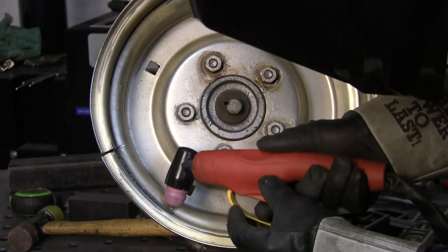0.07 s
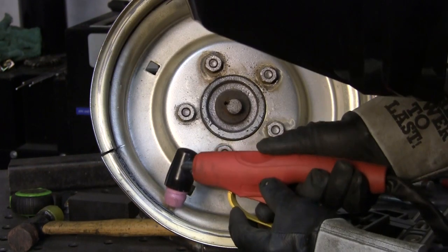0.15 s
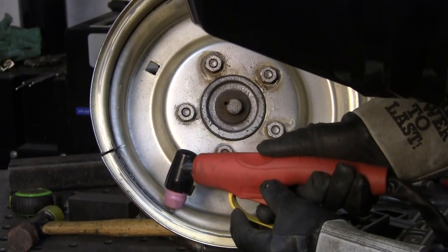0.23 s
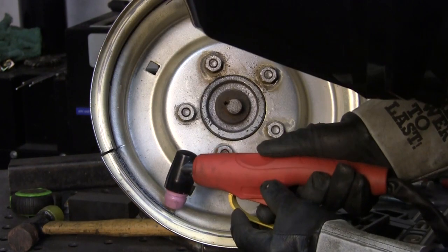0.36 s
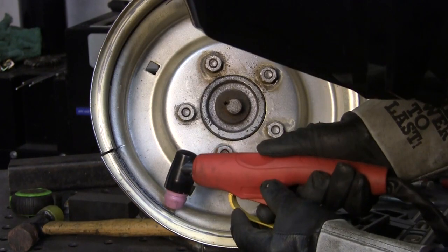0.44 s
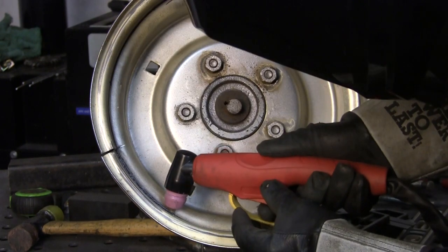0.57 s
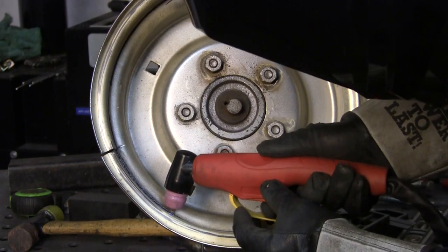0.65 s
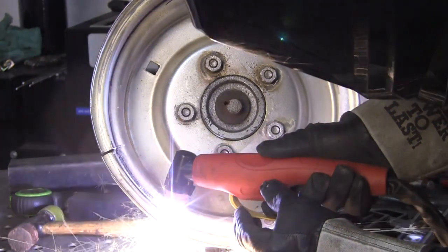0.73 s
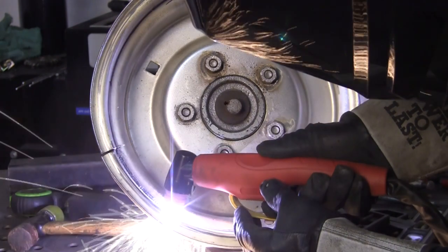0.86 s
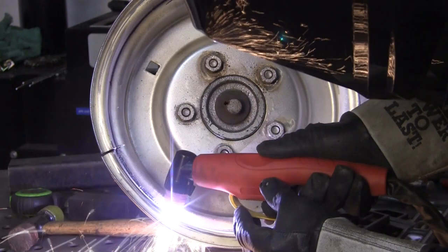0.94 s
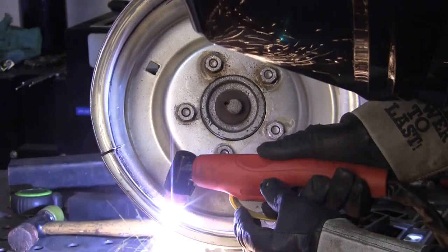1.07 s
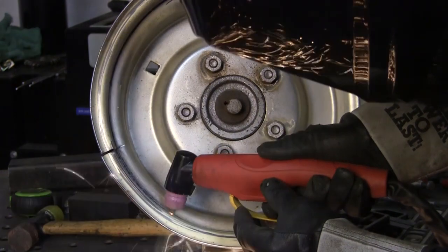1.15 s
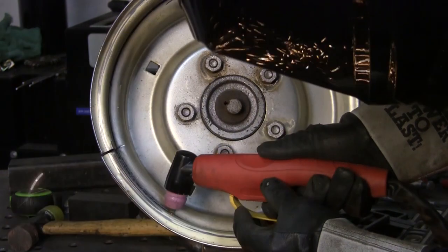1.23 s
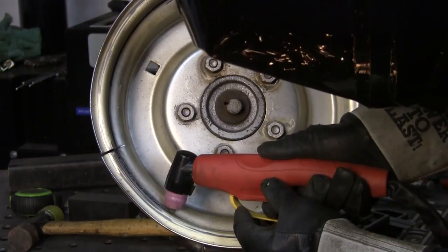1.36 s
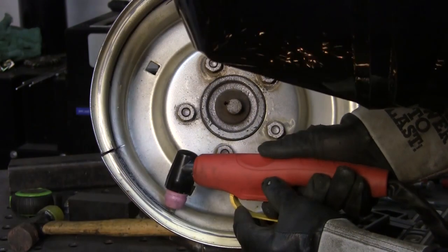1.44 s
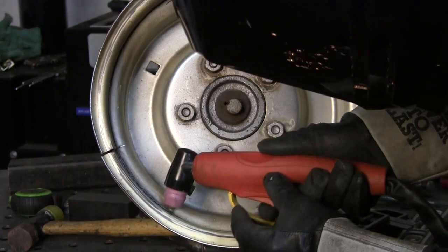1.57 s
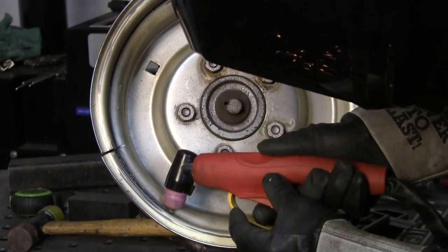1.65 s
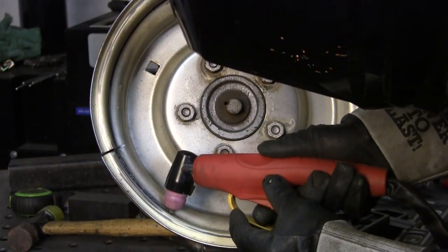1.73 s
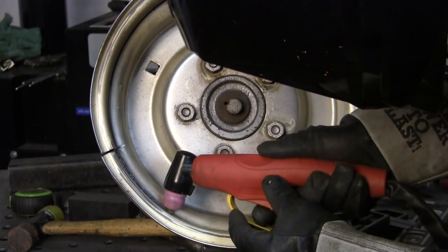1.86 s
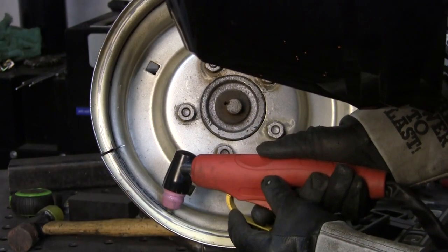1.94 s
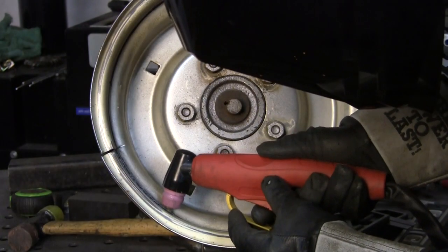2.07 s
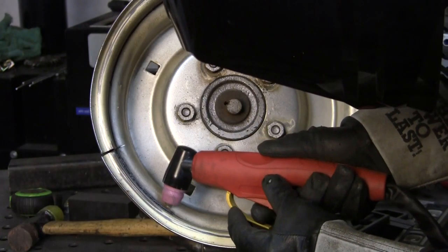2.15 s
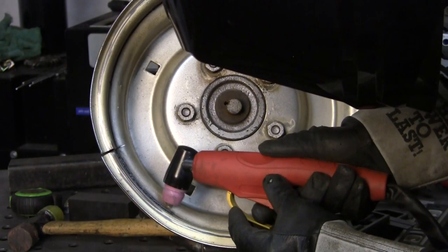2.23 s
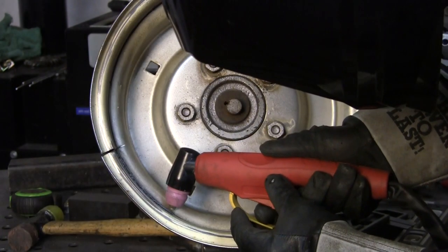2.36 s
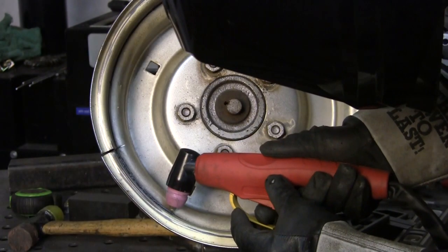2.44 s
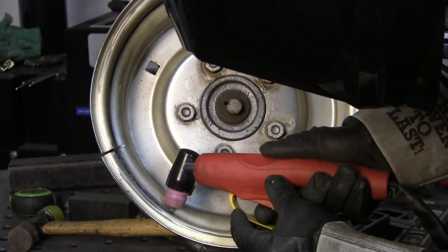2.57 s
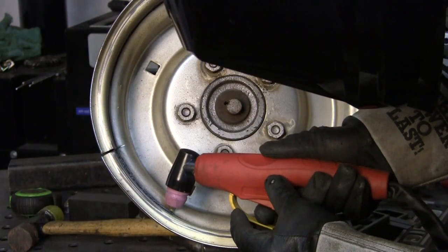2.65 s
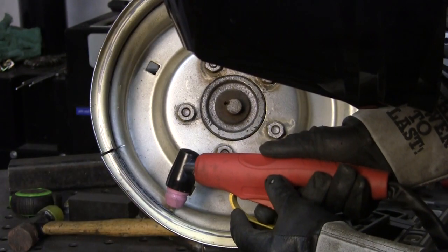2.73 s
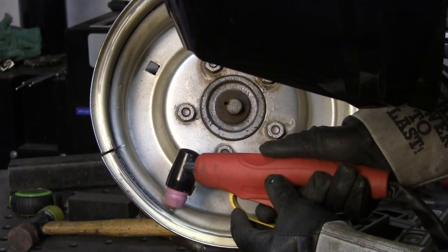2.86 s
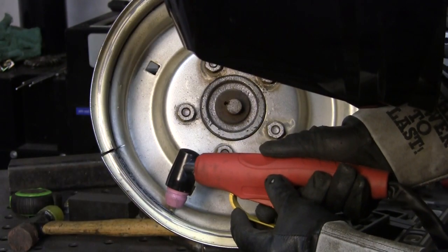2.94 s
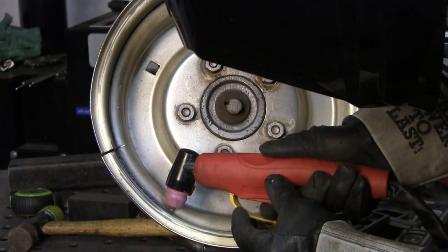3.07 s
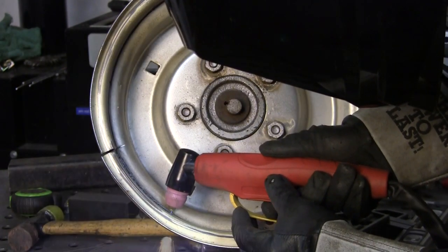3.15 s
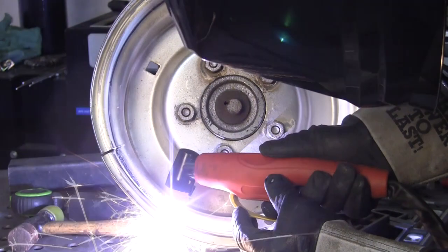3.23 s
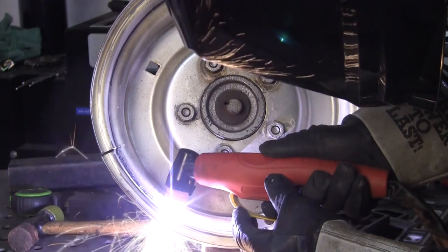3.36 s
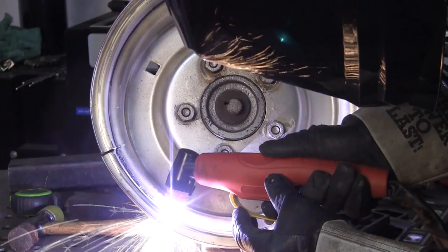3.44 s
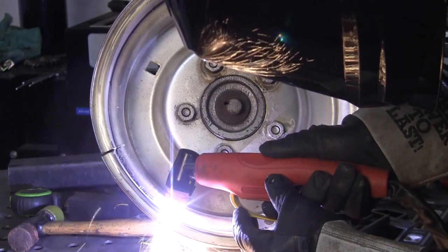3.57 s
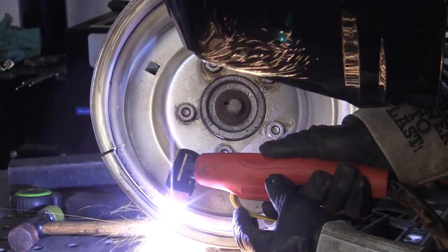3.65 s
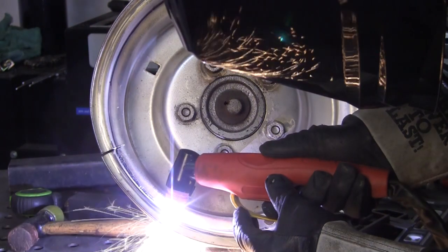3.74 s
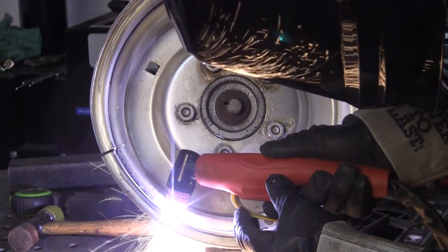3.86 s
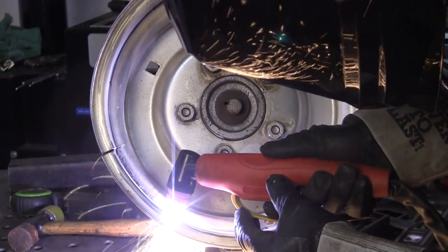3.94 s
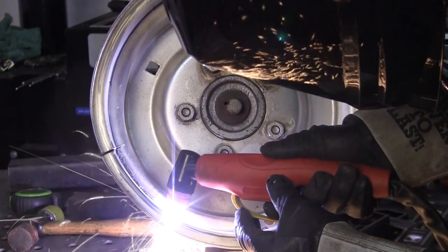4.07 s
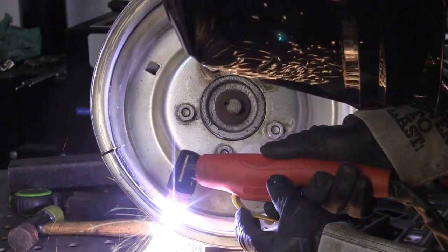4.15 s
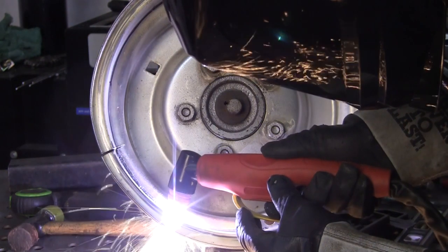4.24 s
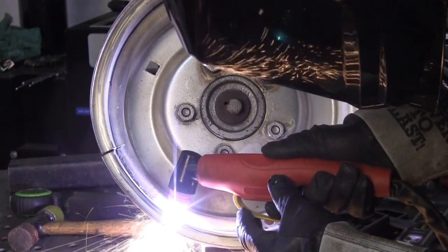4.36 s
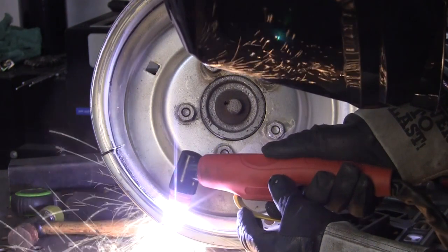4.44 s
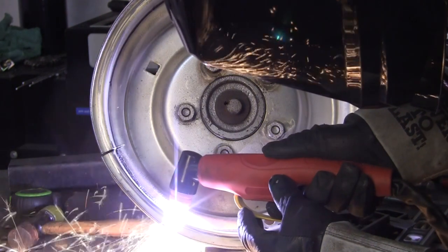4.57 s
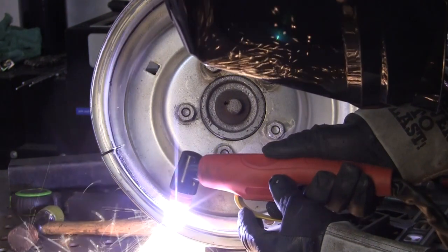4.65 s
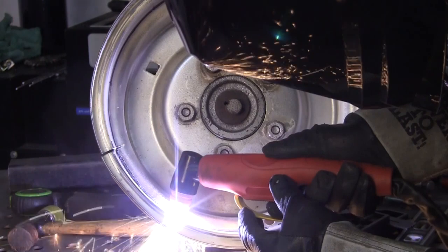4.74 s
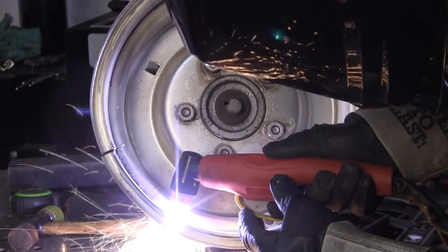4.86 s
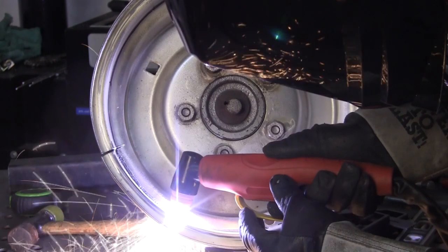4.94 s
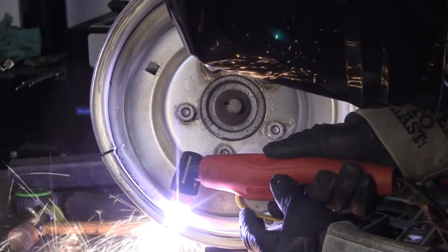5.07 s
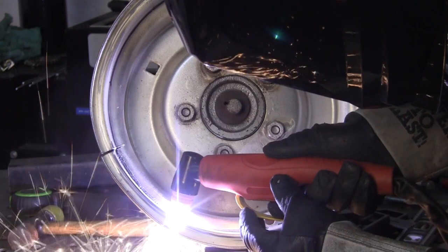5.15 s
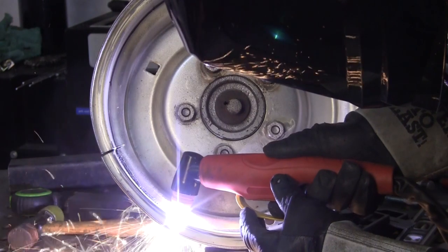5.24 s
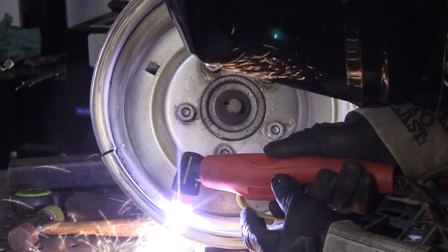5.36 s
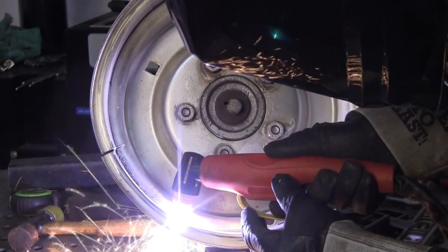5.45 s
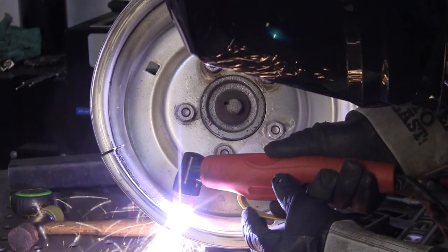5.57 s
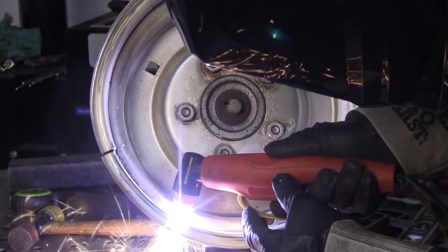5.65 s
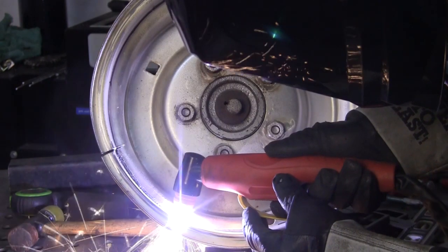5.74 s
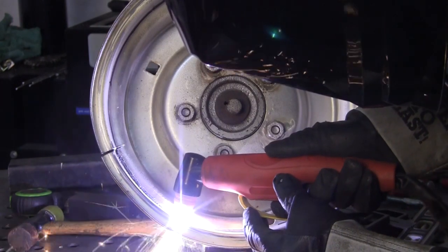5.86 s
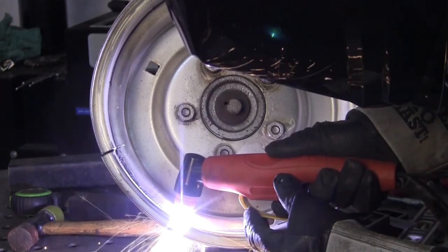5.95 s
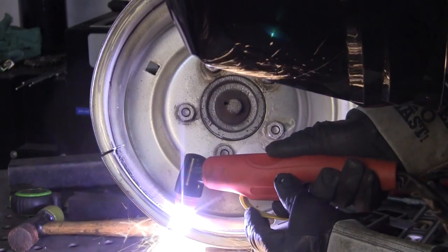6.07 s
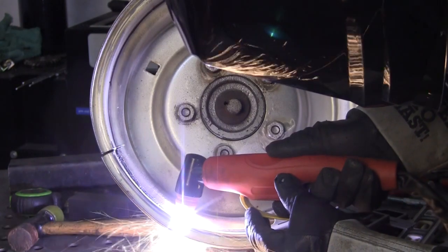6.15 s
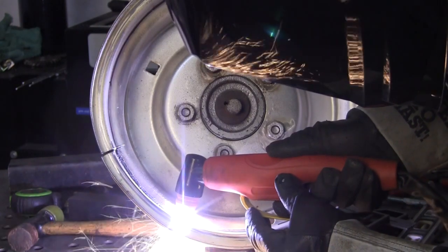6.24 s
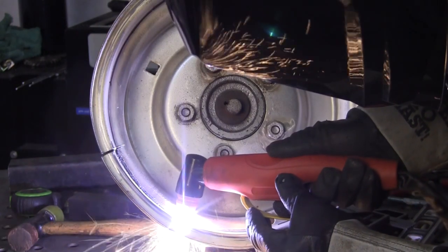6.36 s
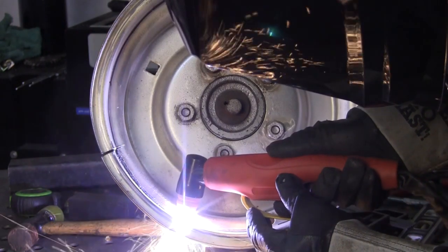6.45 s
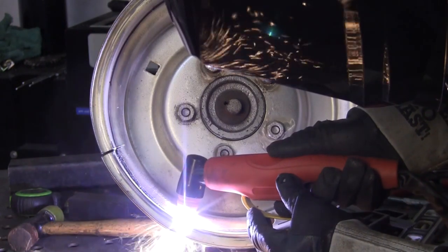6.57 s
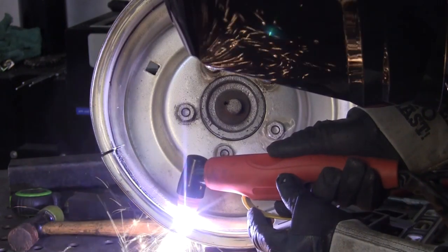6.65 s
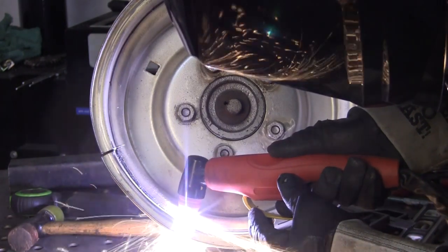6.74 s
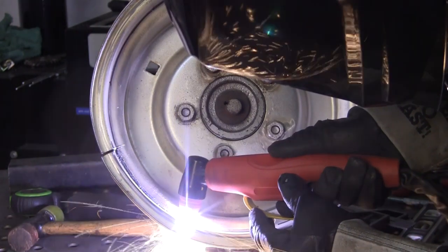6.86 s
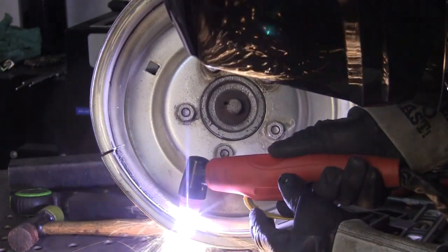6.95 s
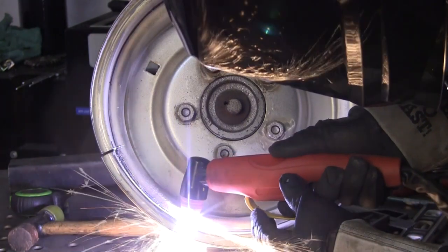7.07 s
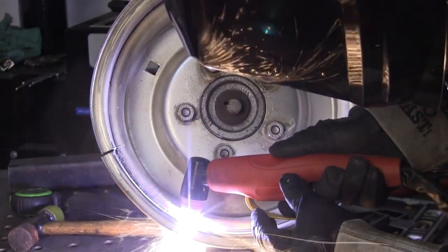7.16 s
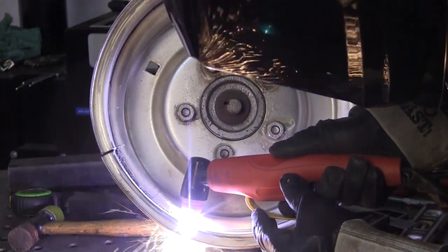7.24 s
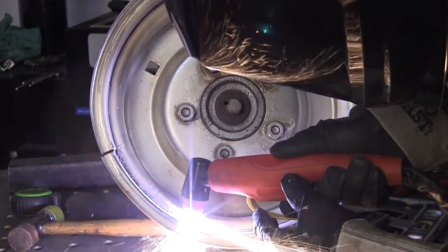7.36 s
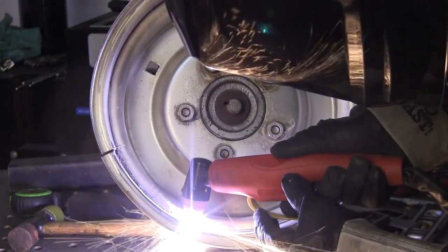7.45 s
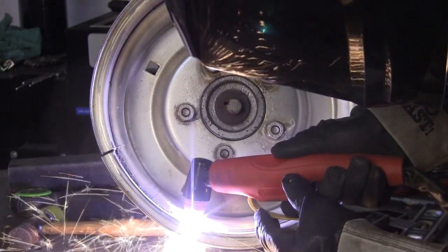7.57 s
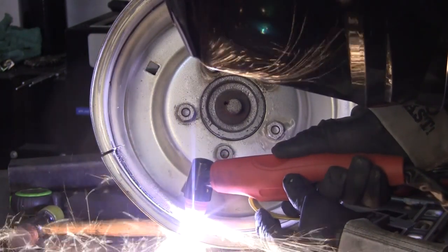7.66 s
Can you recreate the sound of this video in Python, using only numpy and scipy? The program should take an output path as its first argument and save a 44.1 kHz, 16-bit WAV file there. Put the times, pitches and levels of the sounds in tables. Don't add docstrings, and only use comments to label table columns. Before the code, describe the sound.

Close at a workshop bench, a plasma torch already hissing air cuts off, leaving a power unit fan humming further off. The arc pops on, roars briefly, snaps out, and air keeps hissing before dying down. The fan swells in the pause as the microphone's gain recovers. A double pop restarts the torch, which stutters once, then cuts the steel rim in a dense, continuous hiss to the end.

```python
import sys
import numpy as np
from scipy import signal
from scipy.fft import rfft, irfft, next_fast_len
from scipy.io import wavfile
from scipy.ndimage import uniform_filter1d

SR = 44100
rng = np.random.default_rng(int(sys.argv[2]) if len(sys.argv) > 2 else 0)


def magnitude_from_level(level_db):
    exponent = np.asarray(level_db, float) / 20
    return 10 ** exponent


def unload_wav(signal):
    wavfile.write(
        sys.argv[1],
        SR,
        np.round(np.clip(np.atleast_2d(signal).T, -1, 1) * 32767).astype(np.int16),
    )


N = 340011
T = np.arange(N) / SR
SIZE = next_fast_len(N)
HZ = np.arange(SIZE // 2 + 1) * SR / SIZE + 1e-3

# opens_s, shuts_s, rise_s, hiss_db, blow_down_db_per_s2
BLOWS = [
    (-.3, .31, 0.061, -15, 122),
    (.7555, 2.069, .058, -16.5, 205),
    (3.2185, 8.5, 0.032, -16.5, 200),
]


def unit(x):
    return x / np.sqrt(np.mean(x ** 2))


def shape(table):
    hz, db = np.transpose(table)
    return magnitude_from_level(np.interp(np.log(HZ), np.log(hz), db))


def rings(table):
    return np.sqrt(sum(magnitude_from_level(2 * db) / (1 + (2 * (HZ - hz) / width) ** 2) ** 2 for hz, width, db in table))


def noise(gain):
    return irfft(rfft(rng.standard_normal(SIZE)) * gain, SIZE)[:N]


def walk(rate):
    k = int(SR / rate)
    steps = np.repeat(rng.standard_normal(N // k + 1), k)
    return unit(uniform_filter1d(uniform_filter1d(steps, k), k)[:N])


def band(x, low_hz, high_hz):
    hz = np.fft.rfftfreq(x.shape[-1], 1 / SR)
    return irfft(rfft(x) * (hz >= low_hz) * (hz < high_hz), x.shape[-1])


def burning():
    # from_s, to_s, cut_depth (0-1)
    arc_on = [
        (.775, 1.267, .4),
        (3.234, 7.8, 0.8),
    ]
    return uniform_filter1d(sum((T > a) * (T < b) * depth for a, b, depth in arc_on), 200)


def flow():
    # start_s, depth_db, length_s
    stalls = [
        (1.258, 6.5, 0.2),
        (1.704, 0.5, 0.092),
        (3.283, 3, 0.12),
    ]
    rise_from_db, surge_db, surge_s = -19, 3, 0.033
    latest = np.searchsorted(np.transpose(BLOWS)[0], T) - 1
    opens, shuts, rise, full_db, fall = np.transpose(BLOWS)[:, latest]
    drop = rise_from_db * np.clip(1 - (T - opens) / rise, 0, 1) ** 1.6
    drop = drop - fall * np.clip(T - shuts, 0, None) ** 2
    drop = drop + surge_db * np.exp(-((T - opens - rise) / surge_s) ** 2)
    for s, depth_db, length in stalls:
        drop = drop - depth_db * np.interp((T - s) / length, [0, .05, .3, 1], [0, 1, 1, 0])
    return full_db, drop


def gain_db():
    air_db, arc_db, rise_db_per_s, lag_s = -8.5, -15, 10, .012
    ceiling = air_db + (arc_db - air_db) * (burning() > .3) - flow()[1]
    creep = rise_db_per_s * T
    return np.interp(T - lag_s, T, np.minimum.accumulate(ceiling - creep) + creep)


def fan():
    # pitch_hz, level_db (per Hz)
    rush_shape = [(15, -77), (25, -42), (133, -22.5), (183, -22.5), (240, -14.5), (314, -15), (457, -5),
                  (582, -21), (920, -14), (1140, -24), (1800, -24), (3090, -33.5), (3630, -29.5),
                  (5010, -33), (15500, -62)]
    # pitch_hz, width_hz, level_db
    housing = [(705, 110, -12), (1410, 150, -21), (2380, 290, -24), (3650, 380, -29), (4940, 300, -32),
               (6600, 250, -35)]
    # pitch_hz, level_db
    lines = [(522.2, -43), (786.0, -43), (931.3, -39), (1044, -40), (1066, -47), (1308, -51), (1830, -45),
             (1863, -51), (2288, -53)]
    hum_hz, hum_width_hz, hum_db = 457.6, 24, -28
    beat_hz, beat_peak_s, beat_depth, beat_db = 9.1, 2.75, 0.38, -26
    out = magnitude_from_level(-28 + 1.0 * walk(4.89)) * unit(noise(np.hypot(shape(rush_shape), rings(housing))))
    for hz, db in lines:
        phase = 2 * np.pi * np.cumsum(hz * (1 + .0008 * walk(9))) / SR
        out = out + magnitude_from_level(db + 4.5 + 1.2 * walk(25)) * np.sin(phase)
    out = out + magnitude_from_level(hum_db - 7.5) * unit(noise(rings([(hum_hz, hum_width_hz, 0)])))
    phase = 2 * np.pi * np.cumsum(hum_hz + 2.12 * walk(20)) / SR
    beat = 1 + beat_depth * np.cos(2 * np.pi * beat_hz * (T - beat_peak_s))
    return magnitude_from_level(gain_db()) * (out + magnitude_from_level(beat_db + 1.5) * beat * np.sin(phase))


def swell(peak_s, db, rise, fall):
    return magnitude_from_level(db - rise * np.clip(peak_s - T, 0, None) - fall * np.clip(T - peak_s, 0, None))


def gap():
    # pitch_hz, peak_s, peak_db, rise_db_per_s, fall_db_per_s
    gap_tones = [
        (5830, 2.15, -24, 12, 14),
        (894, 2.04, -24, 150, 28),
        (5270, 5.4, -27, 2, 1.5),
    ]
    tones = 0
    for hz, *how in gap_tones:
        tones = tones + swell(*how) * unit(noise(rings([(hz, 0.081 * hz, 0)])))
    leak = swell(2.47, -55, 150, 22) * unit(noise(rings([(6400, 4000, 0)])))
    return tones * magnitude_from_level(.65 * flow()[1]) + leak


def pops():
    # peak_s, peak_db, ring_hz, polarity (+1 or -1)
    arc_pops = [
        (.7737, -16, 550, 1),
        (.8485, -11, 520, 1),
        (1.2588, -4.5, 400, -1),
        (1.2796, -4, 400, 1),
        (1.2893, -5, 430, -1),
        (3.2332, -6, 620, 1),
        (3.2357, -9, 650, 1),
        (3.301, -14, 700, 1),
        (3.3347, -4, 430, 1),
    ]
    # ring_hz, crack_db
    cracks = [(420, -23), (540, -14), (640, -7)]
    ahead = 300
    out, t = np.zeros(N), np.arange(-ahead, 2700) / SR
    for s, db, hz, sign in arc_pops:
        t60 = 16 / hz
        crack_db = np.interp(hz, *np.transpose(cracks))
        blow = (1 - 2 * (np.pi * hz * t) ** 2) * np.exp(-(np.pi * hz * t) ** 2)
        fade = np.exp(-np.log(1000) * np.abs(t) / t60) * np.clip(t * hz, 0, 1)
        ring = fade * (np.cos(2 * np.pi * hz * t) + 0.8 * np.cos(2 * np.pi * 1.8 * hz * t))
        crack = 3 * uniform_filter1d(rng.standard_normal(len(t)), 5)
        crack = crack * (t > -.001) * np.exp(-np.abs(t) / .002)
        start = int(s * SR) - ahead
        out[start:start + len(t)] += magnitude_from_level(db) * (sign * (blow + 0.4 * ring) + magnitude_from_level(crack_db) * crack)
    return signal.sosfilt(signal.butter(2, 105, "high", fs=SR, output="sos"), out)


def surroundings():
    # pitch_hz, width_hz, depth (0-1)
    notches = [(2244, 73, 0.65), (3385, 130, 0.5), (6800, 84, 0.47), (8590, 170, 0.52), (10300, 190, 0)]
    gain = magnitude_from_level(-11 * np.clip(HZ / 1000 - 13.6, 0, 9))
    for hz, width, depth in notches:
        gain = gain * (1 - np.clip(depth, 0, .95) / (1 + (2 * (HZ - hz) / width) ** 2))
    echoes = sum(0.087 * np.exp(-2j * np.pi * HZ * lag) for lag in rng.uniform(.004, .03, 8))
    return gain * np.abs(1 + echoes)


def jet_colours():
    # pitch_hz, level_db (per Hz)
    arc_shape = [(88, -66), (150, -32.5), (454, -5), (605, -11.5), (837, -3.5), (1110, -20.5), (1350, -8.5),
                 (2220, -8.5), (2530, -5), (3310, -4), (5330, -4), (7970, -2), (8760, -8.5), (12400, -17.5),
                 (14400, -24)]
    air_shape = [(88, -65), (150, -38), (310, -12), (454, -1.5), (560, -7), (869, -1.5), (1140, -11.5),
                 (1480, -11.5), (2480, -5), (3310, -8.5), (4490, -6), (5650, -1.5), (7670, -1.5),
                 (11900, -14.5), (14400, -25)]
    # pitch_hz, width_hz, level_db
    arc_rings = [(455, 90, -7), (820, 150, -5), (1390, 54, -4.5), (2000, 220, -7), (2557, 220, -3),
                 (3580, 210, -3.5), (4525, 160, -1.5), (4850, 68, 3), (5240, 430, 0), (6940, 190, -3.5),
                 (7800, 250, 0)]
    air_rings = [(452, 150, -13), (860, 120, -4.5), (1380, 53, -2.5), (1710, 94, -6), (2100, 220, -11.5),
                 (2490, 200, -2.5), (3160, 79, -4), (3550, 120, -3), (4520, 310, 1), (4840, 64, -2),
                 (5570, 230, -1.5), (6740, 170, -6), (7500, 310, -0.5), (9200, 57, -17), (9550, 130, -4)]
    cup_rings = [(10040, 250, -14), (11250, 250, -11.5), (12020, 660, -12), (12900, 280, -28)]
    hot = np.hypot(magnitude_from_level(-0.5) * shape(arc_shape[:-1]), magnitude_from_level(-0.5) * rings(arc_rings + cup_rings))
    cold = np.hypot(magnitude_from_level(1.5) * shape(air_shape[:-1]), magnitude_from_level(2.0) * rings(air_rings + cup_rings))
    path = surroundings()
    hiss = (HZ > 4000) * (HZ < 8500)
    colours = [hot * path, cold * path]
    return [c / np.sqrt(2 * np.sum(hiss * c ** 2) / SIZE) for c in colours]


def dullness_db():
    # strike_s, flash_db, dull_db
    strikes = [
        (.782, 11, 2.5),
        (3.235, 6, 4.1),
    ]
    flash_s, dull_s = .004, .11
    loss = 0
    for s, flash_db, dull_db in strikes:
        loss = loss + dull_db * np.interp((T - s) / dull_s, [0, .2, 1, 1.5], [0, 1, 1, 0])
        loss = loss - flash_db * np.exp(-((T - s) / flash_s) ** 2)
    return loss


def jet():
    jet_bands = [6000, 11500, 2400, 800]
    # time_s, nearness (0-1)
    nearness = [(0, 0.07), (.4, 0), (.76, 0.6), (.83, 0.2), (.87, 0.63), (1.8, 0.44), (2.1, 0.87),
                (2.3, 0.65), (3.22, 0.6), (3.3, 0.16), (3.45, 0.54), (7.71, 0.5)]
    full_db, drop = flow()
    arc, dull_db = burning(), dullness_db()
    near = np.interp(T, *np.transpose(nearness)) - .5
    cold_s = T - np.maximum.accumulate(np.where(arc > 0, T, BLOWS[0][0]))
    top_db = 0.11 * drop - (arc <= 0) - 7.5 * cold_s - dull_db
    middle_db = 0.12 * drop + 7.5 * near - .5 * np.clip(dull_db, 0, None)
    roar_db = -0.36 * drop + 6.5 * near
    change_db = [0 * T, top_db, middle_db, roar_db]

    flutter, shimmer = walk(10), walk(30)
    hits = (rng.random(N) < 90 / SR) * np.minimum(rng.exponential(1, N), 3)
    spits = signal.lfilter([1], [1, -np.exp(-1 / (0.0015 * SR))], hits)

    white, (hot_gain, cold_gain) = rfft(rng.standard_normal(SIZE)), jet_colours()
    centres_hz, out = np.sort(jet_bands), 0
    for octave in np.arange(-6, 9) / 2:
        window = np.clip(1 - 2 * np.abs(np.log2(HZ / 1000) - octave), 0, 1)
        bright = np.clip(octave / 3.2, 0, 1)
        db = 0.15 * flutter + .5 * walk(10) + bright * 0.49 * shimmer + bright ** 9 * 2.5 * spits
        for hz, change in zip(jet_bands, change_db):
            db = db + np.interp(octave, np.log2(centres_hz / 1000), centres_hz == hz) * change
        hot = irfft(white * window * hot_gain, SIZE)[:N]
        cold = irfft(white * window * cold_gain, SIZE)[:N]
        out = out + magnitude_from_level(db) * (arc * hot + (1 - arc) * cold)
    flowing = 1 - uniform_filter1d((drop < -33) * 1., size=150)
    return out * flowing * magnitude_from_level(full_db + drop)


def scene():
    mono = fan() + gap() + pops() + jet()
    return np.array([mono, mono])


def part_channels(out, frame, frame_start):
    edges = [4200, 5150, 6300, 7500, 8950, 10200, 11700, 13000, 14400]
    parted_frames, parted_bands, side_db = .1, .25, -2
    window = np.sin(np.pi * np.arange(2 * frame) / (2 * frame)) ** 2
    starts, whole = np.arange(frame_start, N - 2 * frame, frame), out.mean(axis=0)
    for start, chance in zip(starts, rng.random((len(starts), len(edges)))):
        span = slice(start, start + 2 * frame)
        hiss = rng.standard_normal(2 * frame)
        for low_hz, high_hz, c in zip(edges, edges[1:], chance[1:]):
            if chance[0] < parted_frames and c < parted_bands:
                side = magnitude_from_level(side_db) * band(whole[span], low_hz, high_hz).std()
                out[:, span] += side * window * unit(band(hiss, low_hz, high_hz)) * np.array([[1], [-1]])
    return out


def thin_top(out, dry, frame, frame_start):
    edges = [14300, 14550, 14800, 15150, 15500, 16500]
    luck = np.repeat(rng.random(N // frame + 2), frame)[frame - frame_start + frame // 2:][:N]
    kept = np.where(T < 6.0, .52, .16)
    quiet = uniform_filter1d(dry[0] ** 2, 4 * frame) < magnitude_from_level(-42)
    mid, out = out.mean(axis=0), out[:, :N]
    for k, (low_hz, high_hz) in enumerate(zip(edges, edges[1:])):
        dropped = uniform_filter1d((luck > kept * .8 ** (k - 1.5)) * ~quiet * 1., 400)
        out = out - dropped * band(mid, low_hz, high_hz)[:N]
    return out


def top_cut(x):
    return signal.sosfilt(signal.butter(12, 15660, fs=SR, output="sos"), x)


def record(dry):
    own_shape = [(20, -43), (60, -54), (150, -70), (400, -95), (6000, -92), (9000, -67), (16000, -67)]
    own = np.array([noise(shape(own_shape)) for _ in dry])
    out = np.pad(np.tanh(0.83 * (dry + own)) / 0.78, [(0, 0), (0, SIZE - N)])
    frame, frame_start = 1024, 1016
    out = part_channels(out, frame, frame_start)
    out = thin_top(out, dry, frame, frame_start)
    return top_cut(out)


dry = scene()
out = record(dry)
unload_wav(out)
```